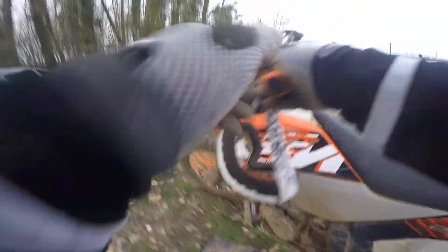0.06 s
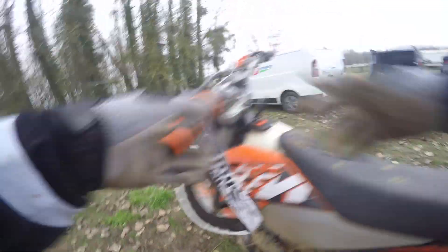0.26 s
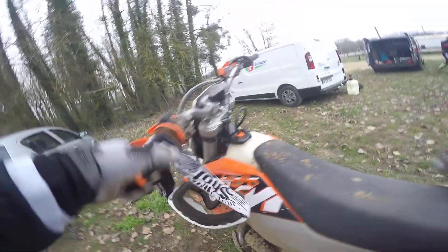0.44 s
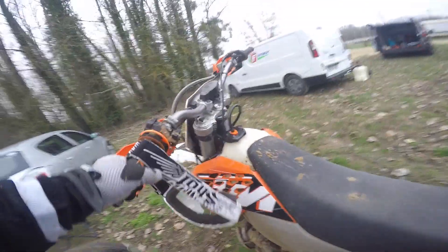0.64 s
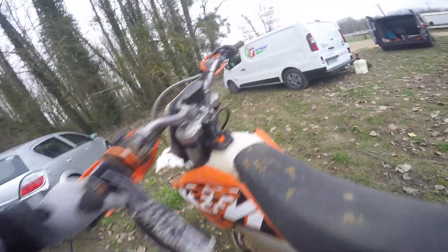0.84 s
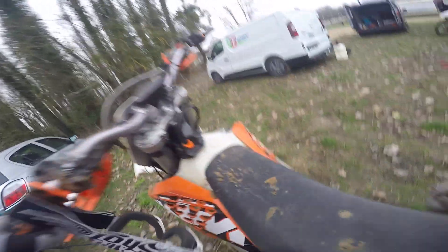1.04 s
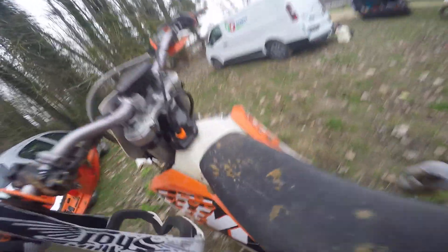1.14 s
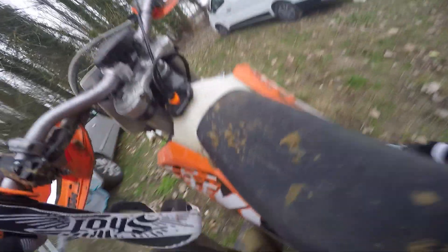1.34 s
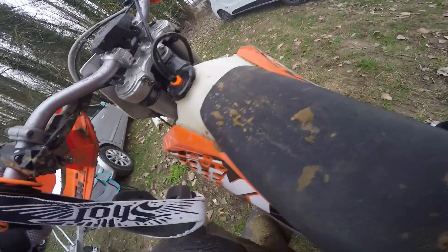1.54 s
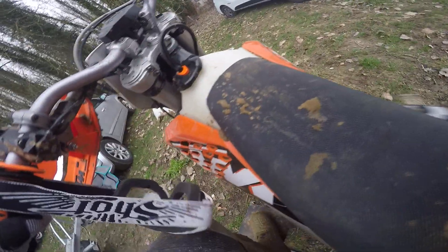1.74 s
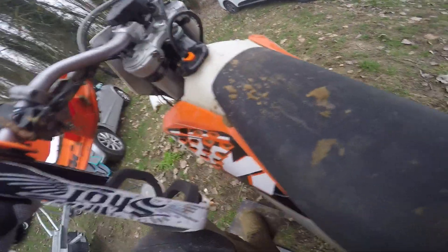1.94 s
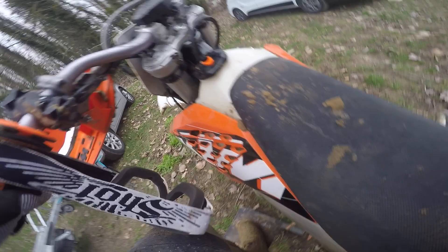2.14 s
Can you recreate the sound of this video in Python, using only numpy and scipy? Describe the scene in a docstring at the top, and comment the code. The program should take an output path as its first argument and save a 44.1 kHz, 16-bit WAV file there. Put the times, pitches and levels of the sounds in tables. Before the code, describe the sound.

A dirt bike clacks, snaps and rattles as it is handled, with clothing rustling.

```python
"""A rider takes hold of a parked dirt bike on grass, heard from a camera worn on the body.
From the start, jacket and gloves rustle, grass scuffs and light wind rumbles on the microphone.
Plastic trim ticks and a metal fitting jingles. After a second the handlebar clacks and rings, a panel
knocks, and something hard snaps against the camera housing, the loudest sound of all.
A loose lever then rattles, and a few last ticks fall around a gust."""
import sys
import numpy as np
from scipy import signal
from scipy.fft import rfft, irfft
from scipy.io import wavfile
from scipy.ndimage import uniform_filter1d, minimum_filter1d

SR = 44100
rng = np.random.default_rng(int(sys.argv[2]) if len(sys.argv) > 2 else 0)


def put_to_file(sound):
    """Save the sound as 16-bit audio at rate SR, in the file named by the first command-line argument."""
    columns = np.atleast_2d(sound).T  # one column per channel
    safe = np.clip(columns, -1, 1)
    whole_steps = np.round(safe * 32767)
    wavfile.write(sys.argv[1], SR, whole_steps.astype(np.int16))


N = 97020
T = np.arange(N) / SR

# contact spectrum of plastic trim and panel: (frequency [Hz], relative level [dB])
PLASTIC_SPECTRUM = [(200, -22), (750, 2), (1200, -5.5), (2300, 2), (4500, -1), (7000, -4.5), (8300, -18),
                    (10000, -15.5), (15000, -38)]


def housing_snap():
    """Impact and rebound excite heavily damped modes; the softer the contact, the narrower its band."""
    # contacts on the camera housing: (time [s], level [dB], upper band limit [Hz])
    contacts = [(1.2469, 1, 7200), (1.254, -22, 3240)]
    # housing modes: (frequency [Hz], relative level [dB], t60 [s])
    modes = [(284.5, -24, 0.035), (646, -34.5, 0.046), (1161, -24.5, 0.03), (1545, -24.5, 0.02),
             (1834, -12, 0.012), (2388, -0.5, 0.0079), (2566, -3, 0.012), (3490, -14.5, 0.017),
             (4275, -7.5, 0.0085), (5130, -14, 0.014), (5720, -9, 0.006), (6480, -9.5, 0.0061)]
    body = sum(low_pass(from_db(db) * ring(start, modes, rise_cycles=0.21), top_hz)
               for start, db, top_hz in contacts)
    hiss = noise([(6000, -12.5), (9000, -18), (11300, -0.5), (15000, -13)])
    bright_edge = hiss * from_db(-27) * burst(contacts[0][0], attack_s=0.00038, t60_s=0.0046)
    return body + bright_edge


def handlebar_clack():
    """Impacts as the handlebar turns set it in free vibration at its inharmonic natural frequencies."""
    # handlebar contacts: (time [s], level [dB], ring gain over crack [dB], favoured frequency [Hz])
    contacts = [(1.0511, -23.5, -8, 2500), (1.0541, -26, 9, 2040), (1.0610, -46, 6, 2700),
                (1.1042, -44.5, 0, 2700)]
    # handlebar modes: (frequency [Hz], relative level [dB], t60 [s])
    modes = [(560, -22, .05), (730, -16, .05), (978, -21, .06), (1172, -17, .05), (1310, -13, .06),
             (1725, -3, .075), (1921, -11, .06), (2200, -11, .07), (2302, -13, .06), (2531, -11, .055),
             (2657, -11, .067), (2970, -10, .063), (3750, -10, .065), (4169, -9, .09), (4825, -11, .06)]
    # contact spectrum: (frequency [Hz], relative level [dB])
    spectrum = [(150, -4), (350, -4), (750, -0.5), (900, -2), (1400, -3), (2300, 11), (3500, -3.5),
                (5000, -2.5), (6000, -10), (7200, -8), (8400, -21.5), (10200, -14.5), (15000, -30)]
    return knocks(contacts, modes, spectrum, attack_s=0.00011, rise_cycles=0.92,
                  crossover_hz=3270, low_t60_s=0.066, high_t60_s=0.073)


def lever_rattle():
    """A part with free play strikes repeatedly, exciting its modes again before they have decayed."""
    # lever contacts: (time [s], level [dB], ring gain over crack [dB], favoured frequency [Hz])
    contacts = [(1.5470, -32, 8.5, 4300), (1.5600, -44, 6, 4300), (1.5630, -35, 11, 3200),
                (1.5897, -35, 8.5, 2550)]
    # lever modes: (frequency [Hz], relative level [dB], t60 [s])
    modes = [(1700, -12, .05), (1860, -14, .046), (2225, -11, .049), (2552, -14, .07), (2680, -7, .05),
             (2910, -9, .04), (3250, -2, .036), (4010, -14, .044), (4500, -9, .027), (5040, -11, .035)]
    # contact spectrum: (frequency [Hz], relative level [dB])
    spectrum = [(200, -18), (1200, -8.5), (1800, -6), (3100, 2.5), (3700, -5.5), (4800, -1.5), (6000, -8.5),
                (8000, -14), (11000, -22), (15000, -33)]
    return knocks(contacts, modes, spectrum, attack_s=0.001, rise_cycles=2.5,
                  crossover_hz=5400, low_t60_s=0.063, high_t60_s=0.047)


def panel_knock():
    """A struck plastic panel sounds hollow through the free decay of a few damped modes."""
    # panel contact: (time [s], level [dB], ring gain over crack [dB], favoured frequency [Hz])
    contacts = [(1.1587, -34.5, 4, 940)]
    # panel modes: (frequency [Hz], relative level [dB], t60 [s])
    modes = [(573, -8, 0.053), (930, -10, 0.072), (1900, 4.5, 0.024), (2410, 0, .06), (2740, -1, 0.04),
             (4980, 2, 0.017)]
    return knocks(contacts, modes, PLASTIC_SPECTRUM, attack_s=0.00031, rise_cycles=0,
                  crossover_hz=5360, low_t60_s=0.077, high_t60_s=0.027)


def trim_ticks():
    """Brief transients have broad spectra, so plastic trim ticks with no clear pitch."""
    # ticks of the trim, except the one at 1.2422 s, a light first touch on the camera housing just before the
    # snap: (time [s], level [dB], t60 [s], upper band limit [Hz])
    ticks = [(0.1876, -33, 0.037, 11200), (0.1908, -38, 0.038, 6530), (0.208, -47, 0.096, 13000),
             (0.461, -41, 0.022, 1780), (1.2422, -37, 0.013, 14000), (1.855, -47, 0.052, 5500),
             (1.8865, -41.5, 0.033, 7900), (2.004, -36, 0.032, 1420), (2.0650, -43, 0.043, 7600)]
    crack = noise(PLASTIC_SPECTRUM)
    return sum(low_pass(crack * from_db(db) * burst(start, attack_s=0.00092, t60_s=t60), top_hz)
               for start, db, t60, top_hz in ticks)


def fitting_jingle():
    """A small, stiff metal fitting has high natural frequencies, so each tap rings thinly."""
    # taps on the fitting: (time [s], level [dB])
    taps = [(.203, -55), (0.227, -59), (0.238, -57.5), (1.058, -44.5), (1.112, -63)]
    # its modes: (frequency [Hz], relative level [dB], t60 [s])
    modes = [(6900, -2, .03), (9376, -20, .36), (10306, -9, .06), (10700, -3, .025), (11150, 0, .025)]
    return sum(from_db(db) * ring(start, modes) for start, db in taps)


def clothing_rustle():
    """Sliding friction: countless tiny slips of fabric add up to noise that swells with each move."""
    # envelope of jacket and gloves: (time [s], level [dB])
    envelope = [(0, -52.5), (.1, -51.5), (.17, -55.5), (.275, -48.5), (.34, -52), (.39, -48), (.44, -54.5),
                (.49, -49.5), (.55, -54), (.61, -49), (.66, -53), (.72, -52), (.82, -54.5), (.93, -52),
                (1.03, -46), (1.11, -49), (1.21, -50.5), (1.29, -56), (1.41, -51), (1.44, -57.5),
                (1.52, -47.5), (1.65, -55), (1.77, -54), (1.84, -60.5), (1.9, -48), (1.95, -57),
                (2.01, -51), (2.05, -59), (2.11, -60.5), (2.2, -53)]
    # rustle spectrum: (frequency [Hz], relative level [dB])
    spectrum = [(300, -3.5), (1000, -4.5), (1500, -4), (1900, -1), (2230, 6.5), (2500, 1), (3200, -1),
                (3700, -8.5), (4400, -5.5), (5500, -16.5), (6800, -17), (8500, -24.5), (11500, -26.5),
                (15000, -35)]
    slips = rng.standard_normal(N) * flutter(rate_hz=1300, depth_db=2.5)
    return colour(slips, spectrum) * level(envelope) * flutter(rate_hz=65, depth_db=1.5)


def fabric_scrapes():
    """Stick-slip friction: fabric catches and lets go, rasping in one narrow resonance."""
    # slips of the fabric: (time [s], level [dB])
    slips = [(.259, -47), (.271, -41), (0.291, -47), (0.307, -51), (.445, -56), (.605, -50), (1.335, -48.5)]
    # their resonance: (frequency [Hz], relative level [dB])
    resonance = [(1000, -55), (2000, -17), (2280, 7), (2650, -9), (6000, -32)]
    envelope = sum(from_db(db) * burst(start, attack_s=0.0021, t60_s=0.042) for start, db in slips)
    return noise(resonance) * envelope


def grass_scuffing():
    """Friction on grass gives dull, uneven noise as rider and bike shift."""
    # scuffing envelope: (time [s], level [dB])
    envelope = [(0, -48), (.12, -48.5), (.2, -55), (.28, -48), (.33, -58), (.39, -47), (.44, -57),
                (.56, -61), (.66, -53), (.73, -44), (.8, -52.5), (.87, -48.5), (1.05, -53), (1.13, -49),
                (1.35, -52), (1.43, -61.5), (1.5, -48), (1.58, -55), (1.64, -65.5), (1.72, -50.5),
                (1.83, -63), (1.89, -51), (2.01, -54.5), (2.09, -57.5), (2.2, -54.5)]
    # scuffing spectrum: (frequency [Hz], relative level [dB])
    spectrum = [(120, 10.5), (225, -0.5), (275, 9), (320, 1), (480, -11), (630, 2), (830, -3.5), (1100, 1),
                (1450, -18), (3000, -64)]
    return noise(spectrum) * level(envelope) * flutter(rate_hz=47, depth_db=0.54)


def wind_rumble():
    """Turbulence in the gusts makes low-frequency pressure fluctuations at the microphone."""
    # gust envelope: (time [s], level [dB])
    gusts = [(0, -39), (.1, -34), (.19, -34), (.28, -35.5), (.54, -41.5), (.6, -33.5), (.78, -32.5),
             (.87, -43.5), (.98, -37.5), (1.04, -47), (1.12, -33), (1.27, -52.5), (1.42, -38.5),
             (1.52, -34), (1.6, -37.5), (1.69, -41.5), (1.8, -45.5), (1.87, -25.5), (1.94, -38.5),
             (2.11, -47), (2.19, -35.5)]
    # turbulence spectrum: (frequency [Hz], relative level [dB])
    spectrum = [(10, -0.5), (22, 4.5), (36, 2), (55, -9), (80, -22.5), (120, -19.5), (200, -44), (500, -43),
                (2000, -92)]
    return noise(spectrum) * level(gusts)


def mount_bumps():
    """Structure-borne sound: the camera mount passes soft bumps of the body to the microphone."""
    # envelope of the bumps: (time [s], level [dB])
    envelope = [(0, -46), (.5, -60), (.75, -46), (1.0, -55), (1.15, -48.5), (1.55, -50.5), (1.75, -59),
                (2.2, -53.5)]
    # their spectrum: (frequency [Hz], relative level [dB])
    spectrum = [(30, -13), (70, 2), (120, 3), (190, -11.5), (400, -41), (2000, -78)]
    return noise(spectrum) * level(envelope)


def outdoor_air():
    """Still air sets a faint floor of stationary noise."""
    # ambient spectrum: (frequency [Hz], relative level [dB])
    spectrum = [(100, -6), (1000, -28), (2500, -36), (5000, -5), (8500, -18.5), (14500, -15)]
    return from_db(-70) * noise(spectrum)


def knocks(contacts, modes, spectrum, attack_s, rise_cycles, crossover_hz, low_t60_s, high_t60_s):
    """An impact gives a noisy crack, whose two bands decay at their own rates, and modal ringing."""
    low_band = low_pass(noise(spectrum), crossover_hz)
    high_pass = signal.butter(8, crossover_hz, "high", fs=SR, output="sos")
    high_band = signal.sosfilt(high_pass, noise(spectrum))
    total = 0
    for start, db, ring_db, favoured_hz in contacts:
        crack = low_band * burst(start, attack_s, low_t60_s)
        crack += high_band * burst(start, attack_s, high_t60_s)
        ringing = from_db(ring_db) * ring(start, struck_at(modes, favoured_hz), rise_cycles)
        total += from_db(db) * (crack + ringing)
    return total


def struck_at(modes, favoured_hz, width_octaves=0.51, far_db=-4):
    """The point of contact weights the modes: those far from the favoured frequency ring less."""
    hz, db, t60 = np.transpose(modes)
    nearness = np.exp(-(np.log2(hz / favoured_hz) / width_octaves) ** 2)
    return zip(hz, db + far_db * (1 - nearness), t60)


def ring(start, modes, rise_cycles=0):
    """Modal superposition: one blow starts damped sinusoids, neighbours in opposite phase."""
    total = np.zeros(N + SR)
    age = T[:SR // 2]
    first = int(start * SR)
    for k, (hz, db, t60) in enumerate(modes):
        rise = 1 - np.exp(-age * hz / (rise_cycles + 1e-9))
        envelope = rise * from_db(db - 60 * age / t60)
        total[first:first + len(age)] += (-1) ** k * envelope * np.sin(2 * np.pi * hz * age)
    return total[:N]


def burst(start, attack_s, t60_s):
    """Envelope of a damped transient: linear rise, then exponential decay by 60 dB in each t60."""
    age = np.maximum(T - start, 0)
    rise = np.minimum(age / attack_s, 1)
    decay_db = -60 * np.minimum(np.maximum(age - attack_s, 0) / t60_s, 10)
    return rise * from_db(decay_db)


def low_pass(x, top_hz):
    """Band limiting removes the treble above top_hz."""
    sections = signal.butter(8, top_hz, fs=SR, output="sos")
    return signal.sosfilt(sections, x + 1e-18)  # the offset prevents underflow in silence


def colour(x, spectrum):
    """Spectral shaping by (frequency [Hz], relative level [dB]) points, normalised to rms 1."""
    hz, db = np.transpose(spectrum)
    bin_hz = np.maximum(np.fft.rfftfreq(N, 1 / SR), 1)
    gain = from_db(np.interp(np.log(bin_hz), np.log(hz), db))
    shaped = irfft(rfft(x) * gain, N)
    return shaped / np.std(shaped)


def noise(spectrum):
    """Filtered white noise takes on the filter's spectrum; rms 1."""
    return colour(rng.standard_normal(N), spectrum)


def flutter(rate_hz, depth_db):
    """Random amplitude modulation: the gain glides to a new value rate_hz times a second."""
    return from_db(depth_db * np.interp(T * rate_hz, np.arange(N), rng.standard_normal(N)))


def level(curve):
    """Amplitude envelope through (time [s], level [dB]) points."""
    return from_db(np.interp(T, *np.transpose(curve)))


def from_db(db):
    """Amplitude ratio of a level in decibels."""
    return 10 ** (np.asarray(db) / 20)


def scene():
    """Superposition in a free field: all sources add at one microphone with no reverberation."""
    impacts = handlebar_clack() + lever_rattle() + panel_knock()
    impacts += trim_ticks() + housing_snap() + fitting_jingle()
    friction = clothing_rustle() + fabric_scrapes() + grass_scuffing()
    background = wind_rumble() + mount_bumps() + outdoor_air()
    return (impacts + friction + background)[None]


def record(dry):
    """Peak limiting briefly lowers the gain at the ceiling; a steep low-pass then limits the band."""
    ceiling, window_samples, cutoff_hz = 0.9, 31, 15300
    needed_gain = np.minimum(1, ceiling / np.maximum(np.abs(dry), 1e-9))
    held_gain = minimum_filter1d(needed_gain, size=window_samples)
    smooth_gain = uniform_filter1d(held_gain, size=window_samples)
    band_limit = signal.ellip(10, .1, 80, cutoff_hz, fs=SR, output="sos")
    return signal.sosfilt(band_limit, dry * smooth_gain)


dry = scene()
out = record(dry)
put_to_file(out)
```